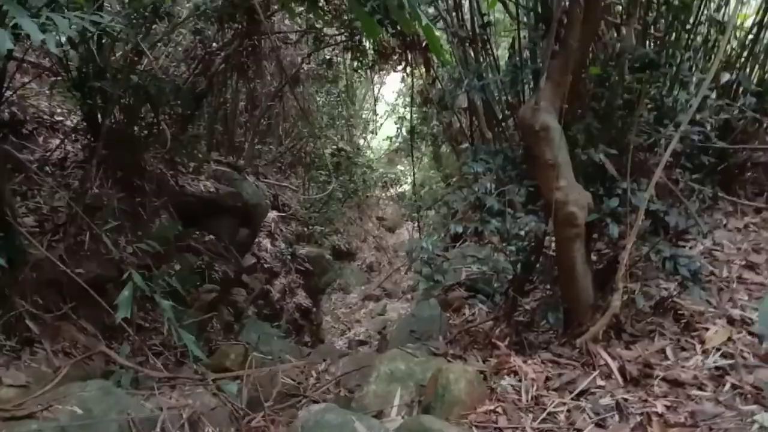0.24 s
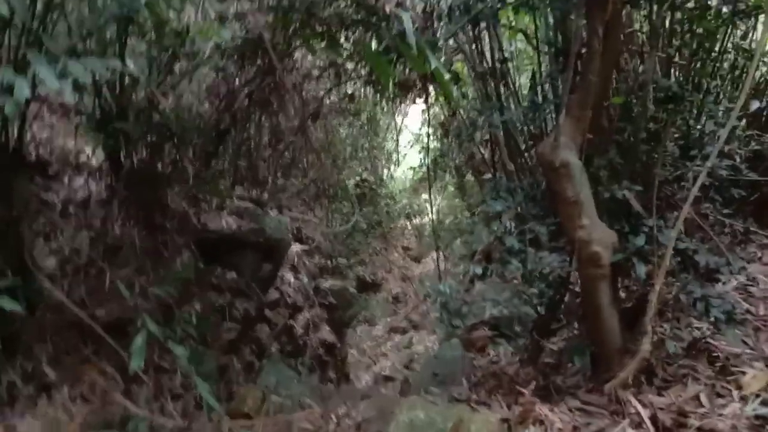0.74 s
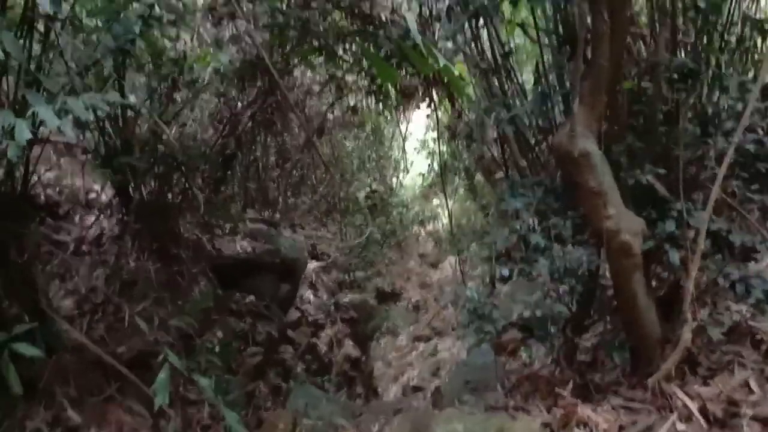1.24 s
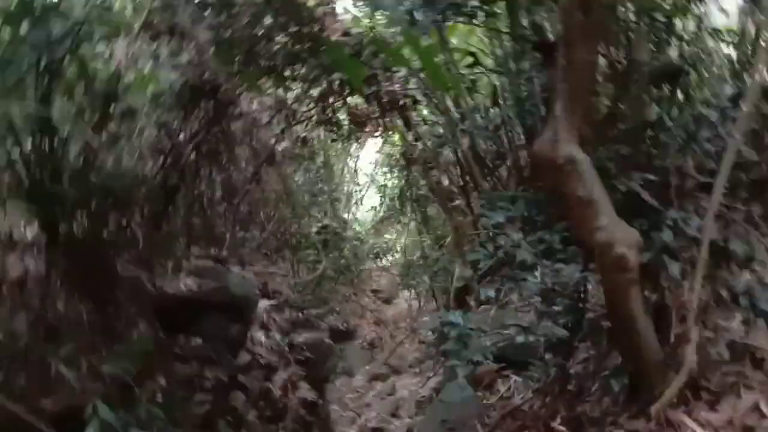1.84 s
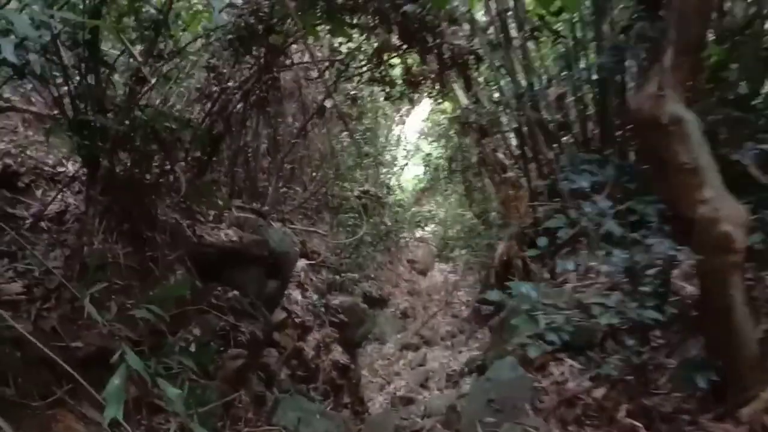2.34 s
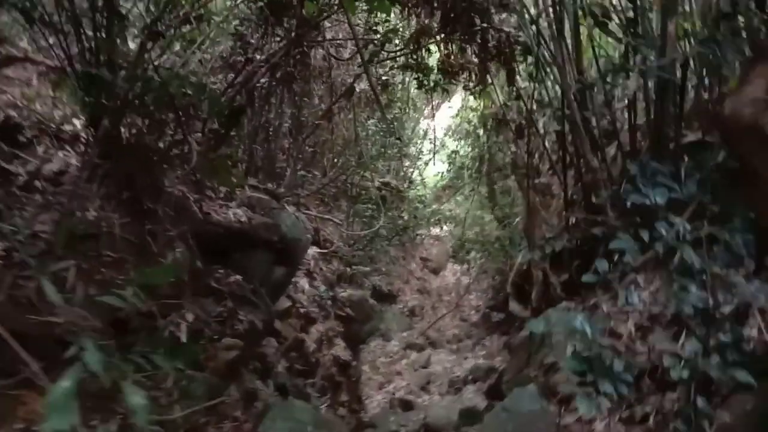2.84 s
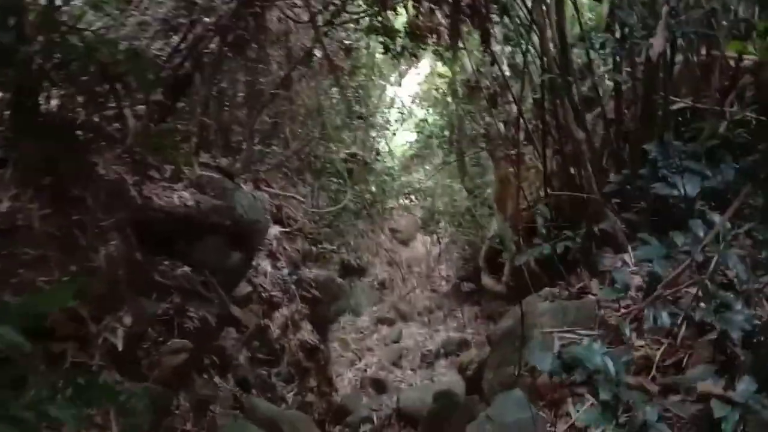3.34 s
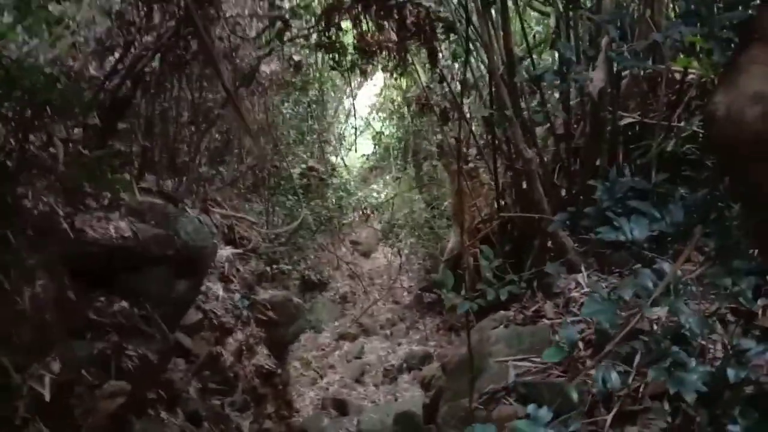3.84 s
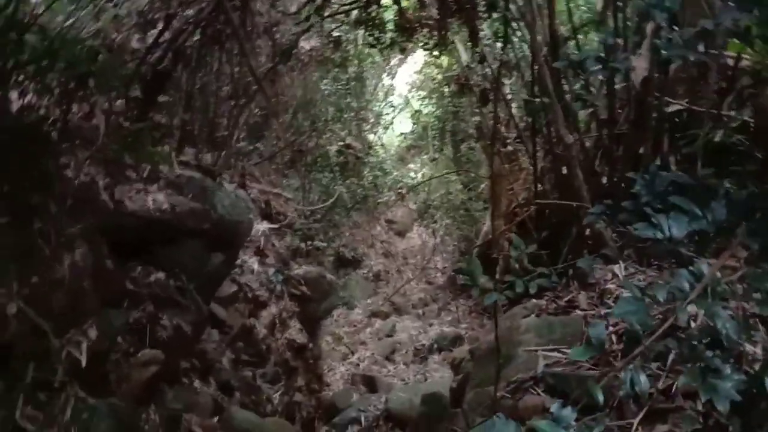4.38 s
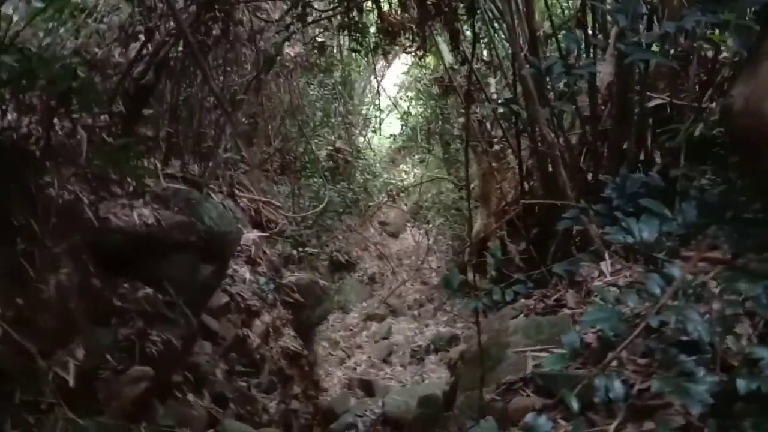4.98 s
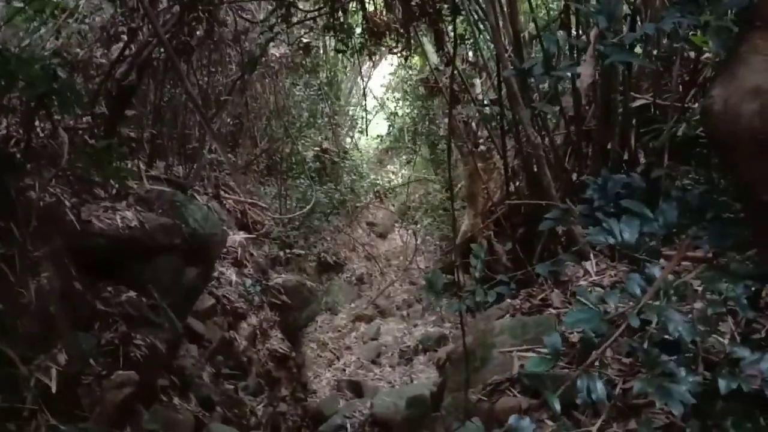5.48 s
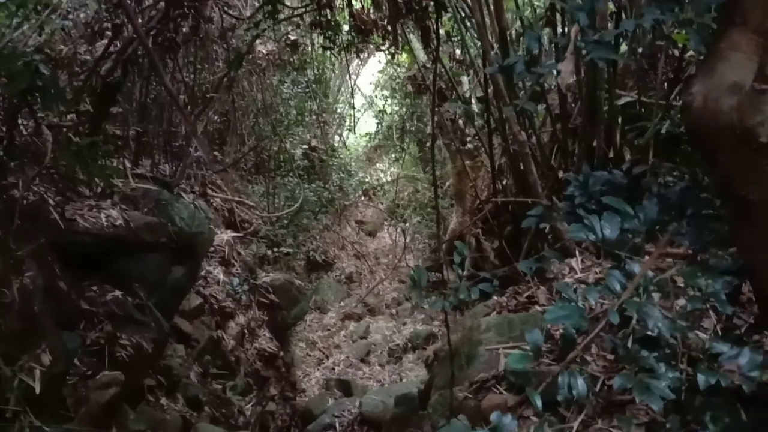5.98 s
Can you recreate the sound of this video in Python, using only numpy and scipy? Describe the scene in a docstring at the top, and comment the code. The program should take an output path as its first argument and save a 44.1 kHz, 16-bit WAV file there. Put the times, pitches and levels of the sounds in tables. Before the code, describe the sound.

Someone walks carefully down a dry, rocky forest gully. Clothing and foliage swish, leaf litter crunches, twigs snap crisply and stones knock dully. A tiny metal fitting scrapes and jingles faintly early on. Activity peaks around the middle, then drops, with a hard double stone clack, a soft sleeve rub and sparse last steps. Close handheld microphone, nearly mono, dry, over very faint insect hiss.

```python
"""Someone picks a way down a dry, stony forest gully, holding a camera; the sound is nearly mono.
From the start, filtered noise gives still air, insect hiss and the swish of clothes and foliage over litter.
Soon stones knock (damped cosines), leaves crunch (showers of grains), twigs snap (noise bursts) and soil thuds.
A small metal fitting then scrapes and rings (modes driven by tiny slips); later two hard stones clack
(decaying modes) and a sleeve drags over the camera's case (swelling noise)."""
import sys
import numpy as np
from scipy import signal
from scipy.fft import rfft, irfft, next_fast_len
from scipy.io import wavfile
from scipy.ndimage import uniform_filter1d, map_coordinates

SR = 44100
rng = np.random.default_rng(int(sys.argv[2]) if len(sys.argv) > 2 else 0)


def bounce(signal):
    """Save signal as a 16-bit WAV file at the path given by the first command-line argument."""
    frames = np.transpose(np.atleast_2d(signal))
    limited = np.clip(frames, -1, 1)
    pcm = np.round(limited * 32767).astype(np.int16)
    wavfile.write(sys.argv[1], SR, pcm)


N = 274067

# Relative spectra of the sources: pitch_hz, level_db (per Hz)
FOREST_SPECTRUM = [(20, 1), (45, -0.5), (100, -0.5), (200, -6), (600, -8), (1050, -19), (1250, -2.5),
                   (1500, -29.5), (3500, -10), (7200, -13), (9500, -31), (15000, -40)]
INSECT_SPECTRUM = [(3500, -29.5), (4100, 22), (4400, 35), (4750, -15), (5100, -27), (6100, -3), (6700, -10),
                   (7250, -10), (8300, -17), (11000, -36)]
SWISH_SPECTRUM = [(100, -17), (400, -50), (900, -15.5), (1700, -10.5), (3500, -8), (6000, -1), (6700, -5.5),
                  (7300, 0.5), (8600, -12.5), (13700, -24), (15000, -5), (15500, -10), (16000, -12)]
LITTER_SPECTRUM = [(40, -41), (100, 4.5), (200, 2.5), (600, 1.5), (1000, 2), (1600, -2), (3000, -0.5),
                   (5000, -8.5), (7400, 1.5), (9000, -41), (15000, -43)]
CRISP_SPECTRUM = [(50, -28), (150, 0.5), (600, 1), (1700, -1.5), (4000, -2), (6000, -1.5), (7500, 1),
                  (8800, -11), (13500, -19), (15200, -3), (16000, -12.5)]
# Cloth and foliage brushing past, one stroke per move of an arm or leg: peak_s, level_db, rise_s, fall_s
LIMB_STROKES = [(.32, -49.5, 0.3, 0.36), (0.778, -53, 0.056, 0.12), (1.1, -51, 0.084, 0.12),
                (1.33, -55.5, 0.095, .2), (1.7, -52.5, 0.34, 0.46), (2.15, -43.5, 0.19, 0.22),
                (2.5, -48.5, .08, .18), (2.66, -48.5, 0.075, 0.049), (2.95, -49, 0.075, 0.27),
                (3.46, -47.5, 0.1, 0.18), (4.03, -63, 0.18, 0.11), (4.29, -51, 0.033, 0.23),
                (4.45, -48.5, 0.16, 0.14), (4.798, -45.5, 0.035, 0.069), (5.24, -60.5, 0.18, 0.081),
                (5.6, -63, .025, 0.032), (5.77, -55, 0.079, 0.11), (6.14, -62.5, 0.082, 0.066)]
# How hard the feet work the litter: time_s, level_db
FOOT_EFFORT = [(0.0, -78.5), (0.59, -71.5), (0.79, -67.5), (1.26, -74), (1.52, -68.5), (1.69, -60.5),
               (2.0, -63.5), (2.13, -59), (2.65, -60), (2.99, -64.5), (3.11, -65.5), (3.65, -65),
               (3.87, -91), (4.24, -84), (4.41, -75), (4.57, -68), (5.6, -84.5), (6.21, -82)]
# Shoes and loose stones knocking: start_s, peak_db, pitch_hz
STONE_KNOCKS = [(0.738, -46.5, 660), (.768, -45.5, 637), (.877, -44.5, 425), (1.554, -36.5, 450),
                (1.574, -35, 1290), (1.638, -29.5, 390), (1.974, -40, 540), (2.087, -40, 490),
                (2.208, -38.5, 520), (2.434, -41, 790), (2.784, -31.5, 876), (2.798, -23.5, 1160),
                (2.84, -20, 1300), (2.904, -32, 587), (3.071, -33, 1380), (3.219, -43.5, 665),
                (3.7804, -20.5, 580), (4.264, -48.5, 344), (4.811, -44.5, 465), (4.995, -56, 450),
                (5.289, -33, 640), (5.314, -47, 510), (5.352, -45.5, 635), (6.11, -39.5, 400)]
# A sole crushing leaf litter: start_s, level_db (rms before the press shapes it), length_s
LEAF_CRUSHES = [(0.748, -51, 0.025), (1.115, -55.5, 0.048), (1.64, -43.5, 0.036), (2.097, -37.5, 0.049),
                (2.43, -40.5, 0.01), (2.774, -44.5, 0.16), (2.866, -37.5, 0.049), (2.928, -34.5, 0.031),
                (3.437, -48.5, 0.029), (3.79, -49.5, 0.041), (4.787, -48.5, 0.04), (5.286, -38.5, 0.0093),
                (5.302, -49, 0.041), (5.746, -51, 0.035)]
# Twigs and leaf stalks breaking: start_s, level_db, pitch_hz
TWIG_SNAPS = [(.7572, -29, 5340), (1.055, -30.5, 6100), (1.1176, -18, 5500), (1.152, -27, 4900),
              (1.6083, -28.5, 2980), (1.6136, -24, 1570), (1.6428, -20, 5500), (1.8271, -28.5, 5700),
              (2.029, -20, 6860), (2.0619, -20.5, 6600), (2.2048, -23.5, 4700), (2.4341, -21, 5140),
              (2.5665, -23, 6340), (2.6214, -30.5, 2260), (2.7817, -22, 2380), (2.8384, -22.5, 2500),
              (2.8913, -23, 5500), (2.9088, -12.5, 5160), (2.9309, -16.5, 4020), (3.0013, -26.5, 1590),
              (3.0239, -21, 7600), (3.0278, -14.5, 7200), (3.2216, -28, 6370), (3.7802, -34, 2220),
              (4.2008, -29, 4870), (4.774, -34, 5230), (4.796, -29, 7450), (4.827, -28.5, 7060),
              (5.0328, -37.5, 6000), (5.2157, -38, 1950), (5.29, -23, 5570), (6.131, -32, 3900),
              (6.1784, -35, 7500)]
# Weight landing on the soil: start_s, peak_db
SOIL_TREADS = [(0.922, -44.5), (1.578, -38.5), (1.615, -35), (1.640, -30), (2.125, -42), (2.782, -37.5),
               (2.9, -40), (2.933, -36.5), (3.781, -40), (5.283, -36), (6.118, -43)]
# A metal fitting sliding on its ring: start_s, level_db, length_s
METAL_SLIDES = [(1.282, -56.5, 0.019), (1.332, -43, 0.0052), (1.366, -50, 0.016), (1.535, -43, 0.0037),
                (1.69, -42.5, 0.055), (1.765, -44.5, 0.017), (1.863, -40, 0.066), (1.934, -38, 0.054),
                (2.054, -66, 0.021)]
# Modes of the fitting: pitch_hz, level_db
METAL_MODES = [(1346, -9), (1787, -21.5), (2099, -10), (2385, -17), (2875, -7.5), (3149, -10.5), (3700, -8),
               (4097, -6), (4190, -3), (5023, -5.5), (5351, -0.5), (6094, 0), (6395, -3.5), (6638, -28),
               (6820, -3), (7600, -8), (7924, -8), (9275, -14.5), (10740, -18), (14917, -11)]
# One hard stone striking another: start_s, level_db
STONE_CLACKS = [(4.2138, -22.5), (4.2215, -29)]
# Modes of the stone: pitch_hz, level_db, t60_s
STONE_MODES = [(1320, -30, 0.019), (1895, 7.5, 0.069), (2100, 11, 0.046), (4200, 14, 0.045),
               (4500, 5, 0.068), (4550, 15.5, 0.029), (4800, -7, 0.045), (5030, 11, 0.021),
               (5770, -10, .06), (5900, 2, 0.15), (7900, 3, 0.038)]
# A sleeve dragging over the camera's case: middle_s, rms_db, half_length_s (to 1/e)
SLEEVE_RUBS = [(4.456, -53, 0.12)]
# Decay of the echo from trunks and banks: pitch_hz, t60_s
ECHO_DECAY = [(150, 0.29), (1200, 0.14), (6000, 0.054), (14000, 0.3)]

T = np.arange(SR // 3) / SR  # clock of one short event, s
TOP_HZ = 15700  # nothing passes above this
INSECT_DRIFT, INSECT_DRIFTS_PER_S = .022, 9  # pitch wander as a share; random knots a second
STROKE_DROP_DB = 12  # lost over one rise or fall time
CRUNCH_DB = 5  # crunch over the foot effort
SETTLE_DB, SETTLE_DB_PER_S = -16, 182  # settling litter: level relative to the tread; decay
TICK_DB, TICK_SPREAD_DB = 6, 10  # weakest leaf flick over the crunch; strongest over weakest
PEBBLE_HZ, PEBBLE_RANGE = 352, 2.85  # lowest pitch; ratio of highest to lowest
PEBBLE_DB, PEBBLE_SPREAD_DB = 6.5, 8  # weakest peak over the crunch; strongest over weakest
KNOCK_T60_S, KNOCK_HARD_DB = 0.054, -25  # base decay of a light knock; strength that halves it
KNOCK_HZ = 540  # pitch at which that base decay holds
SNAP_T60_S, SNAP_HARD_DB = 0.02, -12  # main decay of a light snap; strength that halves it


def amp(db):
    """Decibels are logarithmic: 20 dB is a tenfold gain."""
    return 10 ** (np.asarray(db) / 20)


def unit(x):
    """Power normalisation: scale to rms 1."""
    return x / np.sqrt(np.mean(x ** 2) + 1e-20)


def peaked(x):
    """Peak normalisation: scale to peak 1."""
    return x / (np.abs(x).max() + 1e-20)


def along(points, hz):
    """Interpolation of (Hz, value) points on a log frequency axis."""
    f, v = np.transpose(points)
    return np.interp(np.log(hz + 1), np.log(f + 1), v)


def fade(t60):
    """Exponential damping: 60 dB lost in t60 seconds."""
    return np.exp(-np.log(1000) * T / max(t60, 1e-3))


def wobble(rate):
    """Slow modulation: a smooth random curve with rate knots a second."""
    knots = rng.standard_normal(int(N * rate / SR) + 4)
    return map_coordinates(knots, [np.arange(N) * rate / SR])


def coloured(x, gain):
    """Minimum-phase filtering: the cepstrum of a gain curve, folded to be causal."""
    m = 2 * next_fast_len(len(x) // 2 + 4096)
    cepstrum = irfft(np.log(np.maximum(gain(np.fft.rfftfreq(m, 1 / SR)), 1e-6)), m)
    cepstrum[1:m // 2] *= 2
    cepstrum[m // 2 + 1:] = 0
    return irfft(rfft(x, m) * np.exp(rfft(cepstrum)), m)[:len(x)]


def shaped(x, spectrum):
    """Spectral shaping by a table, at rms 1."""
    return unit(coloured(x, lambda hz: amp(along(spectrum, hz))))


def hump(hz, centre_hz, q):
    """Resonance: the gain of a damped oscillator about its centre."""
    return 1 / np.sqrt(1 + (q * (hz / centre_hz - centre_hz / (hz + 1))) ** 2)


def ripple(hz, depth_db, knot_hz):
    """Random resonances of leaves, stalks and stones, spaced evenly in the root of frequency."""
    knots = rng.standard_normal(256)
    place = np.sqrt(hz / max(knot_hz, 20))
    return amp(depth_db * map_coordinates(knots, [place], mode="mirror"))


def add(track, s, sound):
    """Superposition: mix a sound into the track at time s."""
    part = track[max(round(s * SR), 0):][:len(sound)]
    part += sound[:len(part)]


def grains(size, rate, spread_db):
    """Impulsive fracture: tiny breaks at random times with widely spread sizes, rms 1."""
    sizes = amp(spread_db * np.minimum(rng.standard_exponential(size), 4))
    broken = rng.random(size) < rate / SR
    return unit(broken * sizes * rng.standard_normal(size))


def patchy(x, depth_db, size):
    """Shifting contact: gains vary smoothly at random over time and frequency as different leaves touch."""
    z = signal.stft(x, nperseg=512)[2]
    field = rng.standard_normal(z.shape)
    for axis in (0, 1):
        field = uniform_filter1d(field, size, axis)
    return unit(signal.istft(z * amp(depth_db * unit(field)), nperseg=512)[1][:N])


def cut_short(t60, over_db):
    """Energy-dependent damping: the harder the blow, the shorter the decay."""
    return t60 / (1 + amp(over_db) ** 2)


def forest():
    """Ambient noise: still air and three far insect groups, each wandering in pitch on its own."""
    air = amp(-72) * shaped(rng.standard_normal(N), FOREST_SPECTRUM)
    chorus = np.zeros(N)
    for _ in range(3):
        hiss = shaped(rng.standard_normal(N), INSECT_SPECTRUM)
        clock = np.cumsum(1 + INSECT_DRIFT * wobble(INSECT_DRIFTS_PER_S))
        chorus += map_coordinates(hiss, [clock], mode="mirror")
    return air + amp(-71.0 + 0.95 * wobble(3.4)) * unit(chorus)


def rustle():
    """Friction and fracture: cloth and foliage hiss finely, litter gives way in coarser clumps."""
    swish_db, crunch_db = stroke_level(), crunch_level()
    fibres = rng.standard_normal(N) + amp(-9) * grains(N, rate=900, spread_db=1)
    brushing = patchy(shaped(fibres, SWISH_SPECTRUM), depth_db=2.64, size=5)
    swish = amp(swish_db + 2.34 + 1.87 * wobble(45)) * brushing
    clumps = grains(N, rate=2200, spread_db=2.8) * amp(2.6 * wobble(70))
    crunch = amp(crunch_db) * patchy(shaped(clumps, LITTER_SPECTRUM), depth_db=2.2, size=4)
    return swish + crunch + ticks(crunch_db) + pebbles(crunch_db)


def stroke_level():
    """Power summation: strokes swell and die evenly in dB, and overlaps add in power."""
    t = np.arange(N) / SR
    power = np.zeros(N)
    for s, db, rise, fall in LIMB_STROKES:
        away = np.maximum((s - t) / max(rise, .01), (t - s) / max(fall, .01))
        power += amp(db - STROKE_DROP_DB * away) ** 2
    return 10 * np.log10(power + 1e-20)


def crunch_level():
    """Work and relaxation: litter crunches as hard as the feet work it and settles after each tread."""
    effort_db = np.interp(np.arange(N) / SR, *np.transpose(FOOT_EFFORT))
    power = amp(effort_db + CRUNCH_DB) ** 2
    for s, db in SOIL_TREADS:
        add(power, s, amp(db + SETTLE_DB - SETTLE_DB_PER_S * T) ** 2)
    return 10 * np.log10(power + 1e-20)


def ticks(crunch_db):
    """Damped bursts: single dry leaves flick, louder the more the litter is disturbed."""
    track = np.zeros(N)
    for when, pitch, strength in rng.random((150, 3)):
        centre_hz = 1400 * 5.5 ** pitch
        burst = rng.standard_normal(len(T)) * fade(.014)
        flick = coloured(burst, lambda hz: hump(hz, centre_hz, q=1.8) * amp(along(CRISP_SPECTRUM, hz)))
        db = crunch_db[int(when * N)] + TICK_DB + TICK_SPREAD_DB * strength ** 2
        add(track, when * N / SR, amp(db) * peaked(flick))
    return track


def pebbles(crunch_db):
    """Random impact: small stones shift, louder the more the litter is disturbed."""
    track = np.zeros(N)
    for when, pitch, strength in rng.random((45, 3)):
        db = crunch_db[int(when * N)] + PEBBLE_DB + PEBBLE_SPREAD_DB * strength
        add(track, when * N / SR, amp(db) * knock(PEBBLE_HZ * PEBBLE_RANGE ** pitch, KNOCK_T60_S))
    return track


def knock(centre_hz, t60):
    """Heavy damping: a stone in soil knocks for a few cycles and grinds a little; high ones die sooner."""
    t60 = t60 * np.sqrt(KNOCK_HZ / centre_hz)
    blow = np.cos(2 * np.pi * centre_hz * T) * fade(0.47 * t60)
    contact = coloured(blow, lambda hz: hump(hz, centre_hz, q=0.89))
    grit = rng.standard_normal(len(T)) * fade(1.45 * t60)
    grind = coloured(grit, lambda hz: hump(hz, centre_hz, q=1.05) * ripple(hz, depth_db=3.5, knot_hz=20))
    return peaked(peaked(contact) + amp(-2) * peaked(grind))


def knocks():
    """Impact: shoes strike the larger stones, and harder blows end sooner."""
    track = np.zeros(N)
    for s, db, centre_hz in STONE_KNOCKS:
        t60 = cut_short(KNOCK_T60_S, db - KNOCK_HARD_DB)
        add(track, s + .002, amp(db) * knock(centre_hz, t60))
    return track


def crushes():
    """Cascading fracture: a press breaks a shower of dry leaves, rising fast, then thinning out."""
    track = np.zeros(N)
    for s, db, length in LEAF_CRUSHES:
        u = T / max(length, .003)
        press = peaked((1 - np.exp(-u / 0.13)) * np.exp(-u ** 2.8))
        breaks = grains(len(T), rate=6500, spread_db=1.5)
        shower = coloured(breaks, lambda hz: ripple(hz, depth_db=1.0, knot_hz=22.2))
        add(track, s, amp(db) * press * shaped(shower, CRISP_SPECTRUM))
    return track


def snaps():
    """Sudden release of strain: a stalk cracks around its own pitch and the leaves about it shiver on."""
    track = np.zeros(N)
    for s, db, centre_hz in TWIG_SNAPS:
        t60 = cut_short(SNAP_T60_S, db - SNAP_HARD_DB)
        decay = fade(t60) + amp(2) * fade(0.005) + amp(-14.5) * fade(6 * t60)  # body, crack, shiver
        burst = rng.standard_normal(len(T)) * decay

        def stalk(hz):
            colour = hump(hz, centre_hz, q=1.0) * amp(along(CRISP_SPECTRUM, hz))
            return colour * ripple(hz, depth_db=1.0, knot_hz=23.84)

        add(track, s + 0.001147, amp(db - 2.5) * peaked(coloured(burst, stalk)))
    return track


def treads():
    """Damped compliance: soil takes weight with a soft push, at a new pitch each time, and a rumble."""
    track = np.zeros(N)
    for s, db in SOIL_TREADS:
        push_hz = 175 * np.exp(rng.normal(0, 0.038))
        push = np.sin(2 * np.pi * push_hz * T) * fade(0.029)
        noise = rng.standard_normal(len(T)) * fade(0.12)
        rumble = coloured(noise, lambda hz: hump(hz, centre_hz=161, q=0.24) ** 2)
        add(track, s + 0.00226, amp(db) * peaked(peaked(push) + amp(-9) * peaked(rumble)))
    return track


def jingles():
    """Slip-driven modal ringing: tiny slips of metal on metal keep its modes ringing unevenly."""
    track = np.zeros(N)
    for s, db, length in METAL_SLIDES:
        ring = np.zeros(len(T))
        for hz, level in METAL_MODES:
            ring += amp(level + rng.normal(0, 3.1)) * np.sin(2 * np.pi * (hz * T + rng.random()))
        slips = grains(len(T), rate=4000, spread_db=1.5) * (T < max(length, .003))
        song = signal.fftconvolve(slips, ring * fade(0.074))[:len(T)]
        add(track, s, amp(db + 11.5) * peaked(song))
    return track


def clacks():
    """Modal impact: a hard stone chatters on another, ringing briefly over a gritty crack."""
    track = np.zeros(N)
    for s, db in STONE_CLACKS:
        ring = np.zeros(len(T))
        for hz, level, t60 in STONE_MODES:
            mode = np.sin(2 * np.pi * (hz * T + rng.random())) * fade(t60)
            ring += amp(level + rng.normal(0, 2.4)) * mode
        noise = rng.standard_normal(len(T)) * fade(0.14)
        grit = coloured(noise, lambda hz: hump(hz, centre_hz=4700, q=1) * amp(along(CRISP_SPECTRUM, hz)))
        clack = peaked(ring) + amp(-5) * peaked(grit)
        add(track, s, amp(db - 0.5) * peaked(clack))
    return track


def rubs():
    """Sliding friction: cloth on the case swells and fades with a hollow hiss."""
    t = np.arange(N) / SR
    stroke = sum(amp(db) * np.exp(-((t - s) / length) ** 2) for s, db, length in SLEEVE_RUBS)
    hiss = coloured(rng.standard_normal(N), lambda hz: hump(hz, centre_hz=1390, q=1.0) ** 2)
    return stroke * unit(hiss)


def trees(x):
    """Diffuse scattering: trunks and banks return a faint echo, its decay varying with frequency."""
    hz, t, z = signal.stft(rng.standard_normal(SR // 2), SR, nperseg=256)
    decay = np.exp(-np.log(1000) * t / along(ECHO_DECAY, hz)[:, None])
    tail = signal.istft(z * decay, SR, nperseg=256)[1]
    return signal.fftconvolve(x, tail / np.linalg.norm(tail))[:N]


def scene():
    """Superposition: near sounds over the forest; a faint echo, opposite in sign, parts the channels."""
    near = knocks() + crushes() + snaps() + treads() + jingles() + clacks() + rubs()
    mid = near + amp(-7.5) * trees(near) + rustle() + forest()
    side = amp(-34) * trees(mid)
    return np.array([mid + side, mid - side])


def record(dry):
    """Resonance and band limits: the camera's case adds one hollow mode; deep bass and top treble are cut."""
    lean = signal.sosfilt(signal.butter(4, 66, "highpass", fs=SR, output="sos"), dry)
    m = next_fast_len(N + SR // 2)
    hz = np.fft.rfftfreq(m, 1 / SR)
    case_hz, width_hz, lift = 1255, 70, 1.1  # lift: gain added at the centre
    case = 1 + lift * 1j * hz * width_hz / (case_hz ** 2 - hz ** 2 + 1j * hz * width_hz)
    return irfft(rfft(lean, m) * case * (hz < TOP_HZ), m)[:, :N]


dry = scene()
out = record(dry)
bounce(out)
```